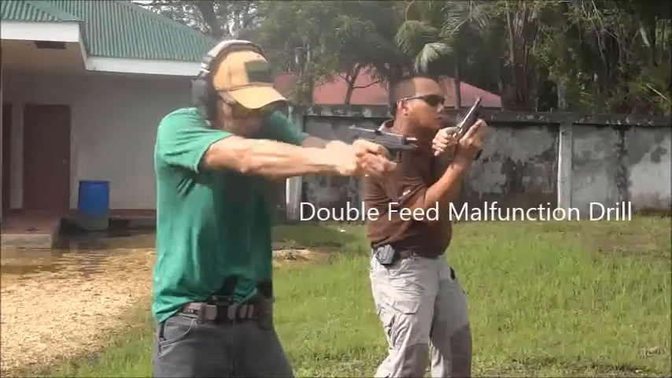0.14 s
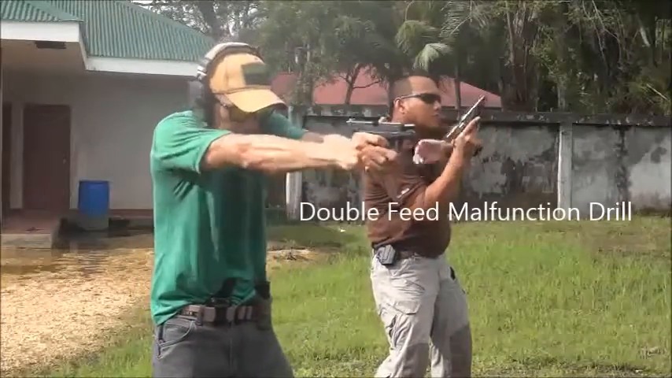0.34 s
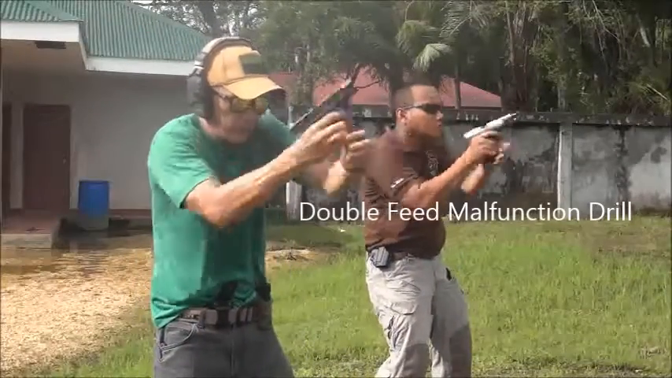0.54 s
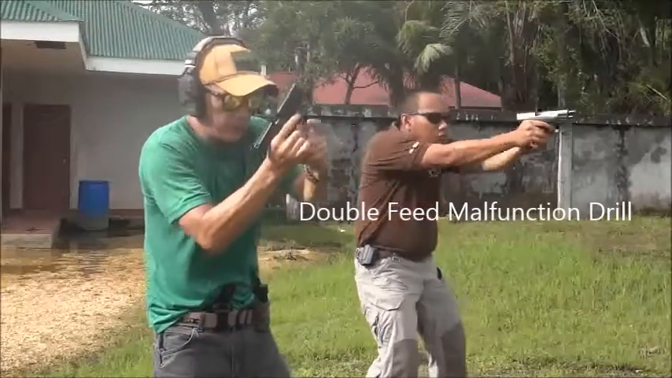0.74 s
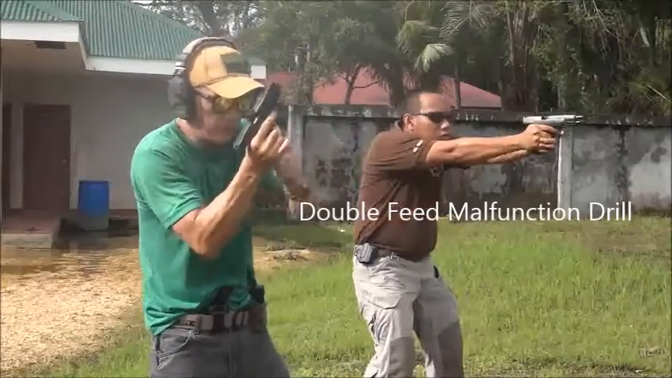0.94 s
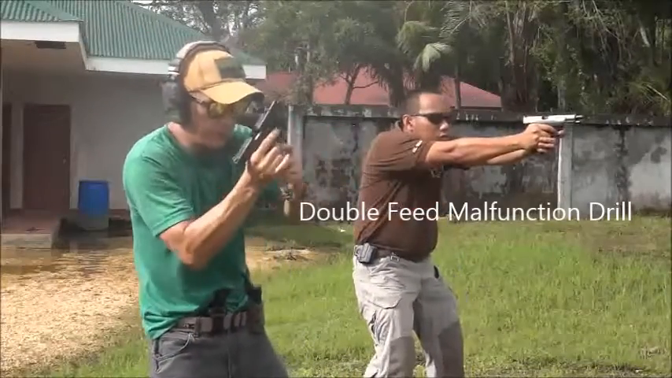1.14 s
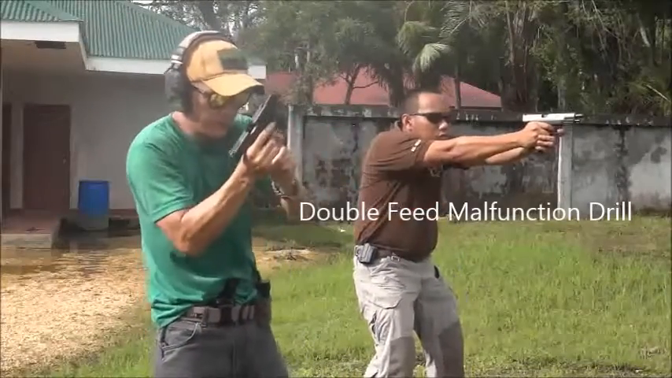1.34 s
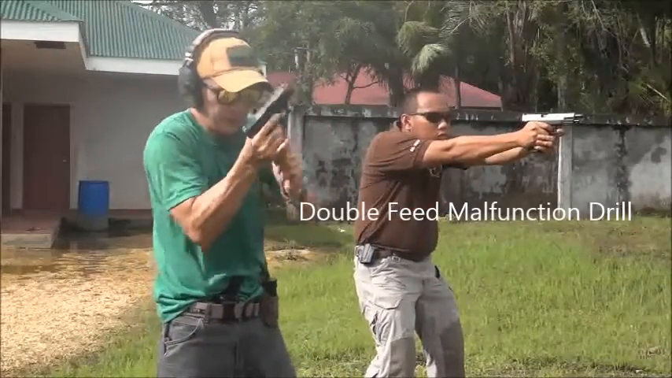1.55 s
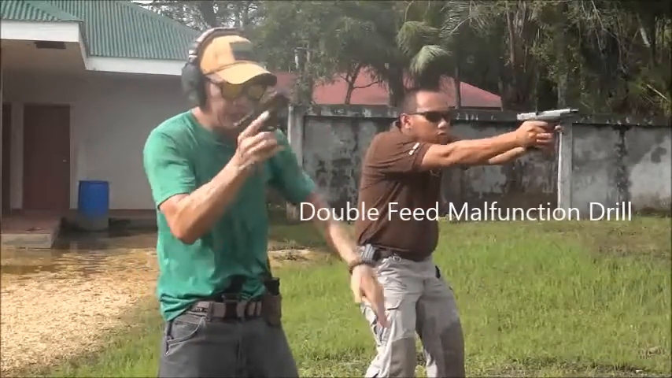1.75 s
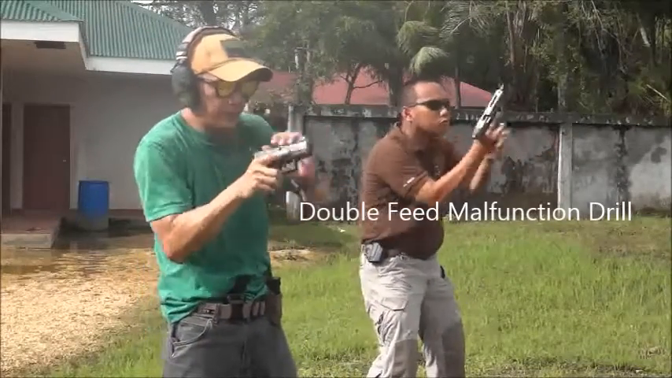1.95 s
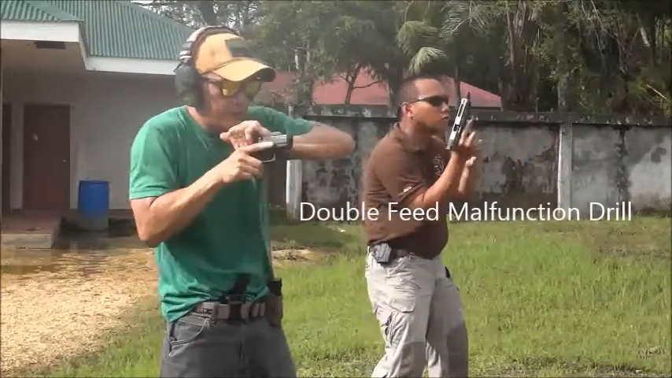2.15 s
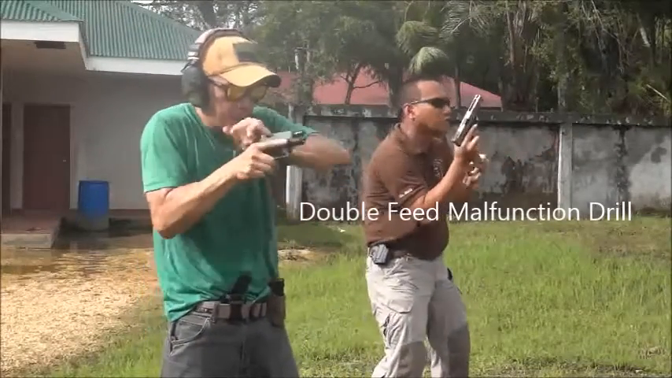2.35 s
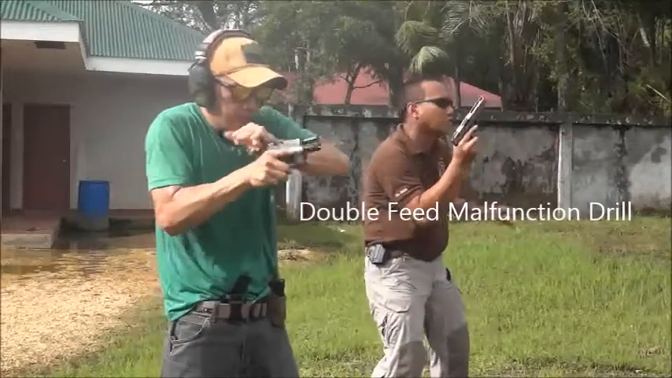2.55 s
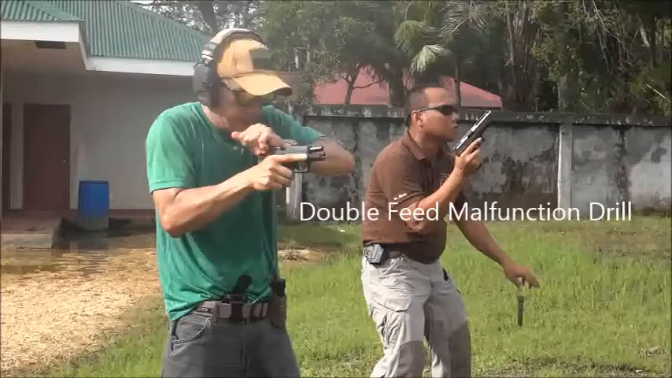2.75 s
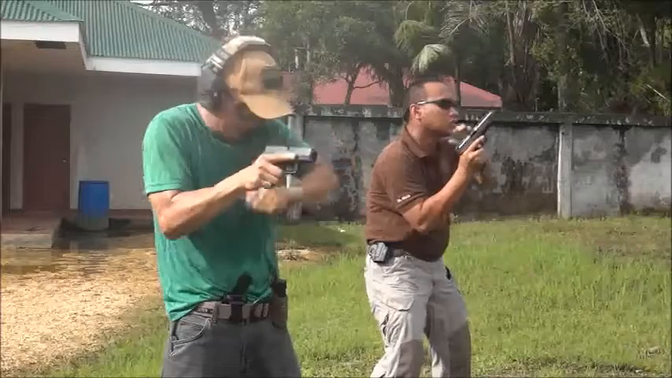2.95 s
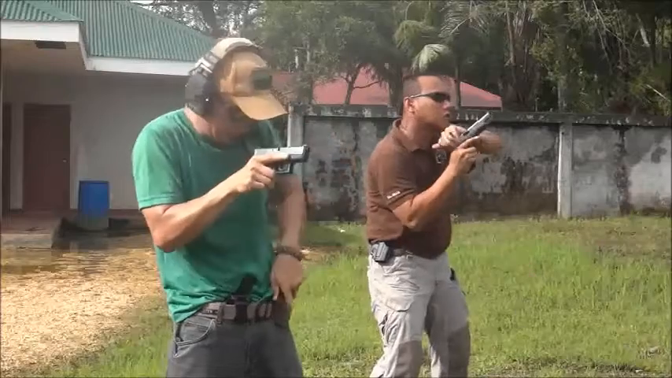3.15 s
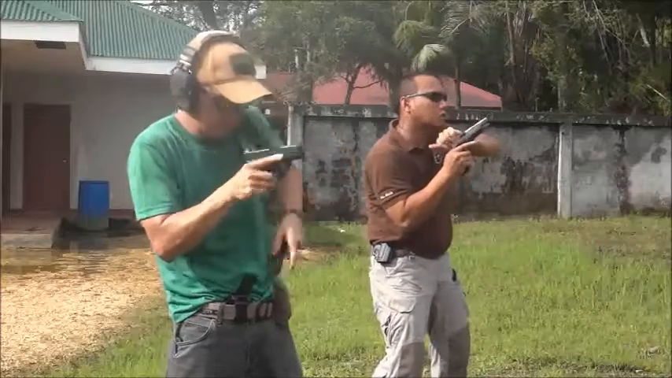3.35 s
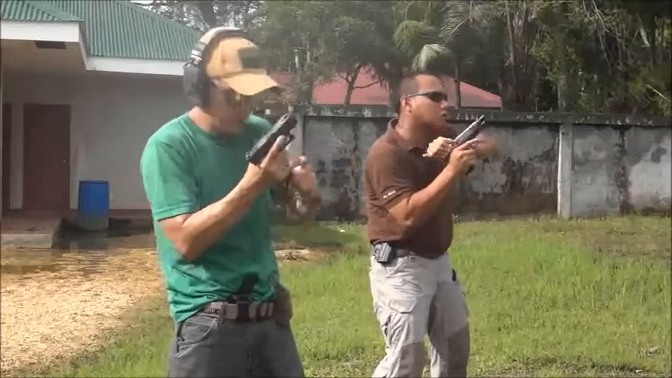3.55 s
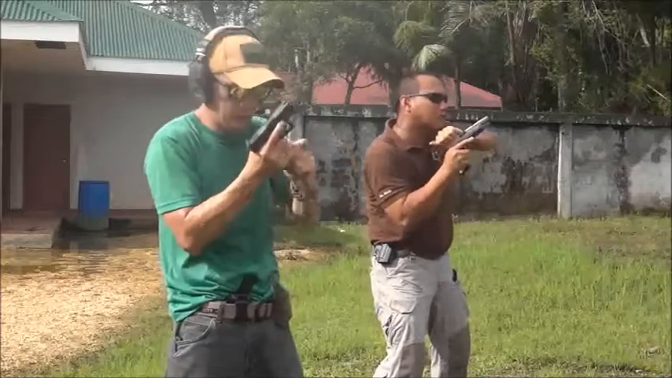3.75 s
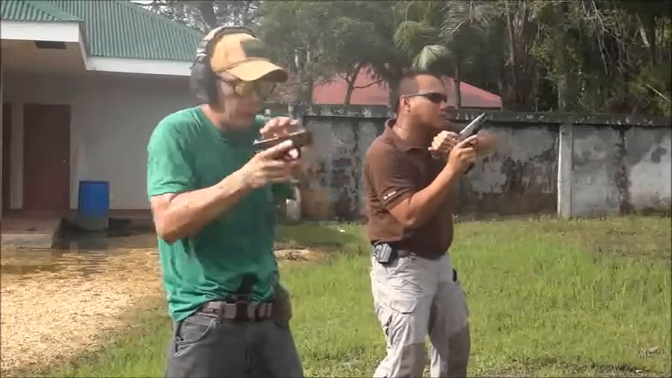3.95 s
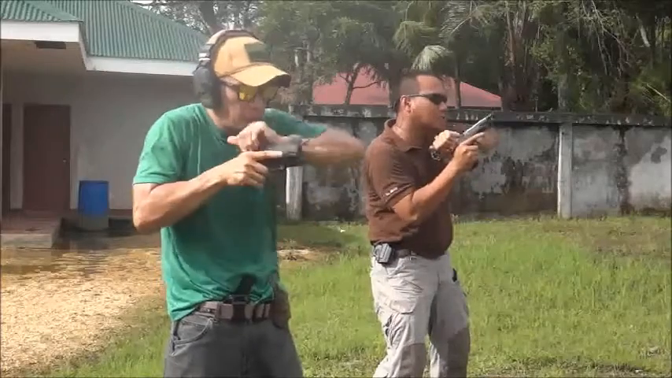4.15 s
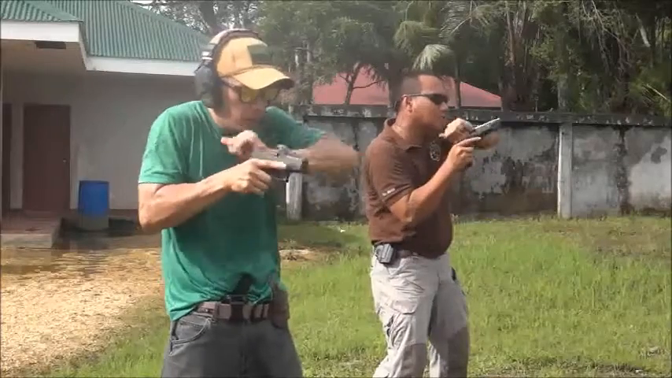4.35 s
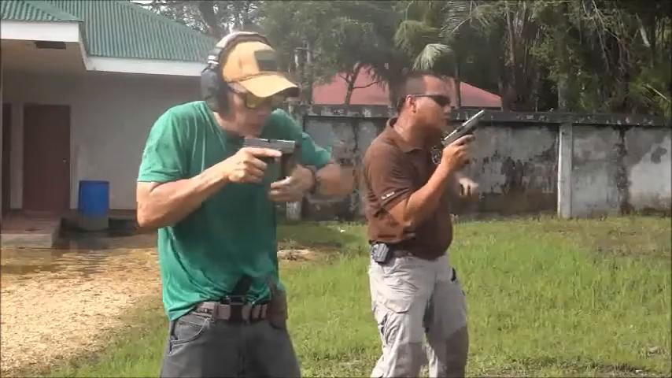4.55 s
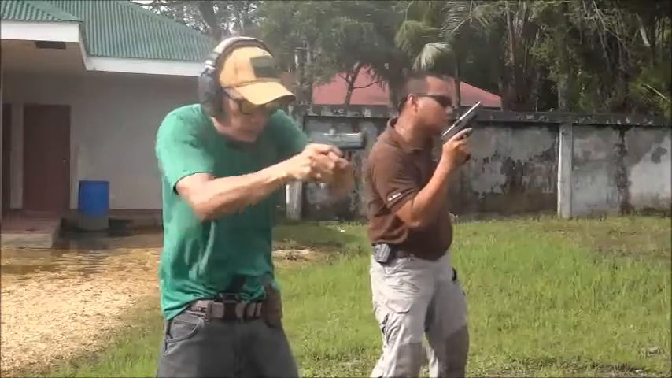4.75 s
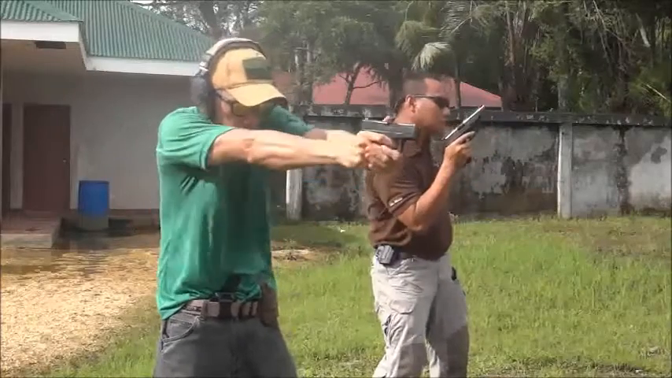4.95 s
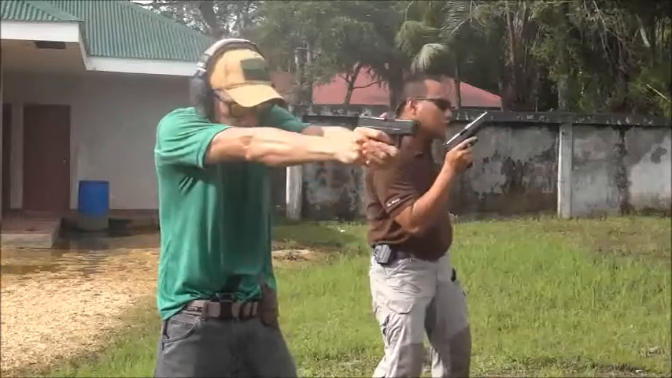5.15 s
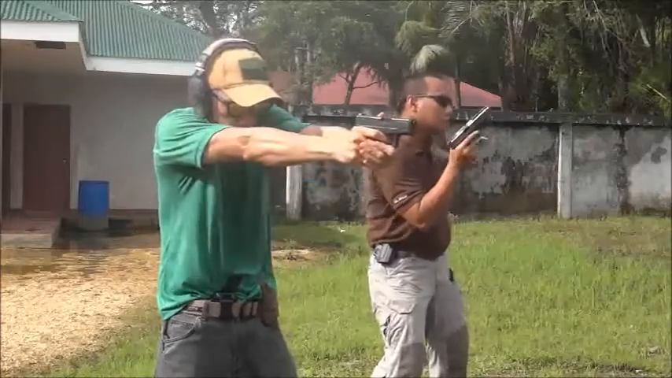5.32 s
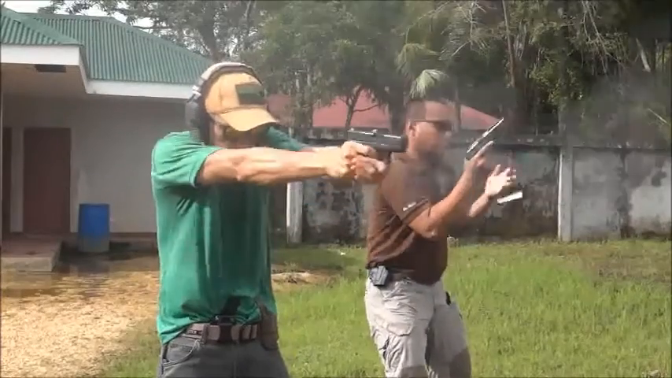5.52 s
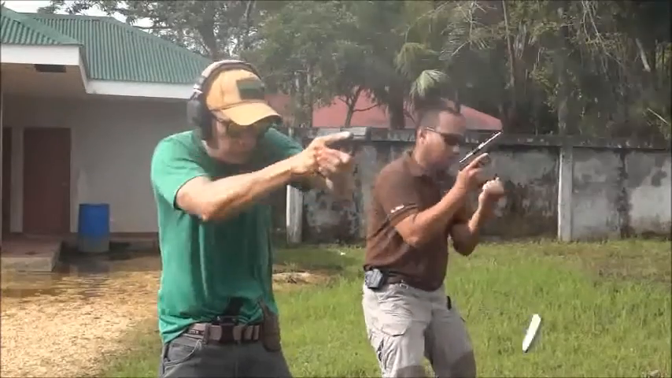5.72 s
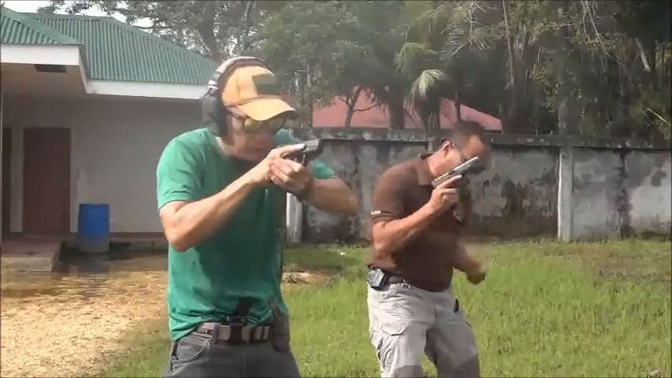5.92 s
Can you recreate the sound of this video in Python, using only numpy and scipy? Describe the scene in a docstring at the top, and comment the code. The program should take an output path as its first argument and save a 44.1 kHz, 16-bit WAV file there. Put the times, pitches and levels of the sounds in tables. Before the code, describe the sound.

Two pistols are racked and stripped close by in sharp metallic clacks outdoors, then one gunshot bangs and rolls back off walls and trees.

```python
"""A grass shooting range beside a house: two shooters rack their pistol slides and strip magazines close by.
Bursts of noise and ticks ring the steel modes of each pistol, and a house wall on the left slaps them back.
One shot rolls back from walls and trees as grainy noise in surging bands. A far rooster crows in wavering
sine overtones; a breeze thumps the microphone as low noise over a steady hush of air, leaves and traffic."""
import sys
import numpy as np
from scipy import signal
from scipy.fft import rfft, irfft
from scipy.io import wavfile
from scipy.ndimage import uniform_filter1d, minimum_filter1d

SR = 44100
rng = np.random.default_rng(int(sys.argv[2]) if len(sys.argv) > 2 else 0)


def master_out(mix):
    """Clip the mix to full scale and print it as 16-bit PCM to the path in sys.argv[1]."""
    frames = np.transpose(np.atleast_2d(mix))
    ceiling = np.clip(frames, -1, 1)
    pcm = np.round(ceiling * 32767).astype(np.int16)
    wavfile.write(sys.argv[1], SR, pcm)


N = 263718
T = np.arange(N) / SR


def undb(db):
    """Amplitude gain of a level in dB."""
    return 10 ** (np.asarray(db) / 20)


def unit(x):
    """Scales x to rms 1."""
    return x / np.sqrt(np.mean(x ** 2))


def curve(rows):
    """Joins the rows of a table by straight lines; gives each column after the time, one value a sample."""
    s, *columns = np.transpose(rows)
    return [np.interp(T, s, c) for c in columns]


def band(x, lo_hz, hi_hz, order=2):
    """Keeps the pitches between two edges."""
    return signal.sosfilt(signal.butter(order, [lo_hz, hi_hz], "band", fs=SR, output="sos"), x)


def split(x, gains, edges):
    """Bands of x, each of rms 1 times its gain; filtered twice so that neighbours join flat."""
    return sum(unit(band(band(x, lo, hi), lo, hi)) * g for g, (lo, hi) in zip(gains, edges))


def colour(x, points):
    """Shapes the spectrum of x by (Hz, dB) points, joined along log frequency."""
    hz, db = np.transpose(points)
    f = np.maximum(np.fft.rfftfreq(N, 1 / SR), 1)
    return irfft(rfft(x) * undb(np.interp(np.log(f), np.log(hz), db)), N)


def ring(x, modes, narrow):
    """Sum of resonances, each with gain 1 at its centre before its own dB; narrow scales their widths."""
    return sum(undb(db) * signal.lfilter(*signal.iirpeak(hz, hz / (width * narrow), SR), x)
               for hz, width, db in modes)


def walk(rate):
    """Random levels held 1 / rate s and slewed twice; spread near 1."""
    k = int(SR / rate)
    steps = np.repeat(rng.standard_normal(N // k + 1), k)
    return 1.38 * uniform_filter1d(uniform_filter1d(steps, k), k)[:N]


def wide(mid, other, side_db):
    """Left and right from a sound and an unrelated twin."""
    side = undb(side_db) * other
    return np.array([mid + side, mid - side])


# each steel hit, and some of the sharper echoes of hits off the house wall; body and top relative to its level:
# start_s, level_db, rise_ms, fade_t60_ms, body_rel_db, top_rel_db, loudest_clank_hz
HITS = [(0.0728, -27, 1.7, 29, -17, -3, 1640), (0.086, -11.5, 2.1, 19, -21, -1.5, 1650),
        (0.1163, -17.5, 0.89, 17, -17, -13, 3980), (.177, -33, 4, 36, -26, -8, 1150),
        (0.2603, -19.5, 1.1, 37, -17, 4, 3950), (0.2715, -12.5, 0.81, 25, -15, 0.5, 2220),
        (0.301, -19, 1.9, 15, -16, -10, 2310), (0.3598, -36, 1.6, 70, -13, -1, 2450),
        (0.451, -45, 2.6, 58, 6, -9, 2000), (0.558, -43, 4, 45, 1, 2, 4000),
        (.95, -30, .6, 75, -1.5, -11, 1730), (0.97, -20, .8, 12, -12, -11, 2270),
        (1.532, -17.5, 8.8, 15, -9, 2, 2600), (1.5465, -12.5, 2.9, 58, -8.5, 6, 4300),
        (1.576, -13, 1.1, 24, -8, -10, 4500), (1.588, -28.5, 3, 130, 0, 1, 2560),
        (1.643, -25.5, 1.3, 35, -4, 2, 4600), (1.6574, -34.5, 2.8, 99, -11, 3, 4400),
        (1.794, -35, .9, 27, 7, -25, 1750), (1.84, -36.5, 2.7, 24, 0, 8, 1700),
        (1.854, -44, 2, 29, 11, -14, 2100), (1.9265, -18, 5.6, 32, 0, -2, 1500),
        (1.94, -23, 1.6, 20, -17, -12, 3100), (2.19, -39, 2.8, 44, -12, -4.5, 3020),
        (2.2633, -16.5, 6.5, 29, -7.5, -1, 2320), (2.278, -17.5, 2.6, 79, -9.5, 6, 6560),
        (2.304, -14.5, 15.4, 22, -21, -9, 1610), (2.323, -8, 2.4, 13, -4.5, -3, 2100),
        (2.3303, -14.5, 0.49, 33, -4.5, 6, 3320), (2.344, -23, 1, 78, -8, 0, 4730),
        (2.368, -21.5, 14, 100, -10, -0.5, 6300), (2.41, -17, 3.6, 73, -9, 2.5, 4500),
        (2.4592, -22, 1.7, 43, 1, -11, 1430), (2.4983, -14, 0.63, 35, 0, -19, 1420),
        (2.523, -21.5, 2.3, 56, -7, 9.5, 2730), (2.5362, -14.5, 2.3, 70, -11, -5, 1460),
        (2.5648, -12, 1.4, 49, -7, 0.5, 4530), (2.597, -27, 2, 18, -12, -8, 2300),
        (2.63, -23, 1.4, 18, -14, -16, 3730), (2.6387, -32, 11, 32, -5, -18, 1580),
        (2.662, -9.5, 2.6, 42, -13.5, 1, 4000), (2.693, -22, 1.5, 14, -14, -6, 4600),
        (2.75, -32, 6.8, 39, -9, 4, 2970), (2.762, -18, 1.2, 9.2, -6, 7, 2420),
        (2.767, -11, 3.1, 46, -6, -8, 2310), (2.7919, -22, 4.6, 11, -13, -11, 3700),
        (2.799, -10.5, .8, 43, -6.5, -2.5, 4780), (2.859, -22.5, 1.3, 24, -15, 5.5, 6840),
        (2.8675, -15, 1.6, 38, -8.5, -9, 4600), (2.8854, -8.5, 1.9, 44, -17, 0, 3200),
        (2.917, -20, 1.8, 45, -6, -9, 4650), (2.953, -38, 1.4, 34, -23, 12, 6160),
        (2.983, -33, 1.8, 96, -5, 4, 4540), (3.0407, -15.5, 1.5, 28, 2, 1.5, 2890),
        (3.052, -23, 5.7, 98, -25, -5, 4000), (3.1247, -31.5, 0.88, 104, 5, -11, 2930),
        (3.17, -37.5, 13, 79, -7, -6, 4680), (3.358, -42, 3, 70, 5, 5, 4500),
        (3.5254, -14, 1.4, 35, -10, 4, 4450), (3.5337, -11, .85, 59, -12, -3, 7200),
        (3.5678, -17.5, 1.2, 22, -5.5, -2, 4360), (3.5768, -18, 1.9, 103, -8, 5, 3300),
        (3.598, -19.5, 12, 53, -10, 2, 4060), (3.659, -36, 2.5, 14, -10, 0, 4110),
        (3.668, -20.5, 2.2, 24, -8, -6, 3280), (3.6864, -31, 7.6, 41, -1, -4, 2440),
        (3.7005, -6, 2.1, 36, -9, 4, 7540), (3.73, -25, 2.3, 38, -8, 2, 3330),
        (3.7904, -25.5, 1.2, 33, -2, 5, 1870), (3.8186, -12.5, 1.35, 18, -8, 5, 4300),
        (3.826, -14.5, 1.4, 41, -12, 1, 4600), (3.8594, -17, 3.4, 9.8, -27, -2, 3450),
        (3.8662, -17.5, 2.5, 78, -7, 7, 3500), (3.894, -18, 3.4, 36, -18, -9, 2190),
        (3.9435, -48, 1.8, 38, -6, -17, 5230), (3.959, -41, 1.5, 84, -4, -15, 1920),
        (3.9856, -29, 4.6, 140, -5, -6, 3280), (4.0095, -11.5, 6.6, 39, -10, 2.5, 3400),
        (4.04, -17, 4.2, 24, -16, -7, 3360), (4.1022, -29, 2, 43, -16, 0.5, 2130),
        (4.1398, -41, 2.2, 39, -24, -9, 3320), (4.1611, -13.5, 0.88, 28, -19, 2, 2140),
        (4.166, -18, 3.7, 68, -6.5, 2.5, 2280), (4.1978, -12, 0.49, 94, -26, -1.5, 1255),
        (4.229, -14.5, 2, 83, -23, -8, 1240), (4.271, -14, 4, 26, -26, -2, 3380),
        (4.2812, -12, 5.6, 52, -6, -11, 2660), (4.312, -17, 2.3, 69, -21, 4, 1204),
        (4.345, -14.5, 1.8, 27, -23, -21, 4100), (4.353, -14.5, 2.4, 31, -17, -11, 3270),
        (4.364, -16, 1.3, 12, -4, 7, 4380), (4.3716, -9.5, 3, 38, -22, -3, 4340),
        (4.403, -25, 3, 36, -11, -2.5, 1990), (4.4914, -37.5, 5.9, 110, -11, -18, 2070),
        (4.5962, -41, 10, 200, -17, -10, 3000), (4.665, -38, 1.4, 68, -8, -1, 4370),
        (4.698, -43.5, 1.6, 29, 11, -12, 3290), (5.08, -47, 3, 30, 10, -4, 1300),
        (5.1278, -39.5, 2.6, 31, 18.5, -10, 1280), (5.161, -57, 2.6, 28, 5, -11, 1060)]
FADE_BEND = 0.89  # below 1 a rattle drops fast from its crest and then lingers


def hits(grit):
    """Each hit or sharp echo is a tick, then a short rattle with its own clank builds to a crest and dies away."""
    power, tick, clank = np.zeros((3, N)), np.zeros(N), np.zeros((2, N))
    ms = np.arange(int(.13 * SR)) / SR * 1000
    for s, db, rise_ms, t60_ms, body_db, top_db, hz in HITS:
        now = slice(int(s * SR), int(s * SR) + len(ms))
        rise = (ms / rise_ms) ** 0.61
        fall = 10 ** (-3 * (np.maximum(ms - rise_ms, 0) / t60_ms) ** FADE_BEND)
        rattle = np.minimum(rise, fall)
        power[:, now] += np.outer(undb([db + body_db, db, db + top_db]), rattle) ** 2
        tick[now.start] += undb(db - 4) * np.exp(-rise_ms / 5)  # slow builds start with a weaker tick
        for g, c in zip(grit, clank):
            c[now] += undb(db + 11) * ring(g[now] * rattle, [(hz, hz / 18, 0)], 1)
    return np.sqrt(power), tick, clank


# each spell of handling, slide and springs rubbing: start_s, hands_still_s, level_db, fade_db_per_s
RUB = [(0.06, .16, -34.5, 13), (1.6, 1.9, -35.5, 90), (2.27, 3.012, -28, 37), (3.628, 4.456, -25.5, 45)]
RUB_RISE_S, RUB_TOP_DB, RUB_TOP_SAG = 0.032, -8, 0.51  # the top fades faster by this share
JOLTS_PER_S, JOLT_DB, JOLT_S = 17, 0.5, 0.0055  # loose parts knock now and then


def rubbing():
    """Levels of body, middle and top as slides stick and slip, loose parts jolt and the hands fall still."""
    knocks = 1. * (rng.random(N) < JOLTS_PER_S / SR)
    jolts = signal.lfilter([1], [1, -np.exp(-1 / (JOLT_S * SR))], knocks)
    uneven = undb(3.2 * walk(90)) * (1 + undb(JOLT_DB) * jolts)
    power = np.zeros((3, N))
    for start, still, db, fade in RUB:
        lost_db = fade * np.maximum(T - still, 0)
        swell = np.clip((T - start) / RUB_RISE_S, 0, 1) * uneven * undb(db - lost_db)
        tone_db = [[-14], [-5], [RUB_TOP_DB]] - np.outer([0, 0, RUB_TOP_SAG], lost_db)
        power += (swell * undb(tone_db)) ** 2
    return np.sqrt(power)


def clang(drive, modes):
    """Blows land on ever other spots, so each mode is struck hard at one moment and barely at the next."""
    return sum(ring(drive * undb(3.5 * walk(45) - 3.5), [mode], 0.69) for mode in modes)


# a house wall on the left returns each hit: delay_s, level_db
WALL = [(0.0306, -30), (0.0304, -14)]
WALL_PAN_DB, WALL_TOP_HZ = 12, 6100


def house_wall(steel):
    """The wall sends the steel back late, dulled and louder on the left."""
    dull = band(steel, 530, WALL_TOP_HZ, order=1)
    echo = sum(undb(db) * np.roll(dull, int(s * SR)) for s, db in WALL)
    return echo * undb([[WALL_PAN_DB / 3], [-WALL_PAN_DB * 2 / 3]])


# which pistol is being worked: time_s, share of the second (0-1)
SECOND = [(0, 1), (.6, 0), (1.4, 0.01), (3.3, 0), (3.45, 0.97), (4.22, 0.99), (4.3, 0.34), (5.5, 0.8)]
# steel modes of each pistol, widths before clang narrows them: pitch_hz, width_hz, level_db
FIRST_PISTOL = [(1404, 110, -3), (2012, 170, -8), (3158, 54, -9), (4640, 110, -7), (6830, 160, -13),
                (7300, 210, -13.5), (9460, 240, -4), (10810, 103, -14.5)]
SECOND_PISTOL = [(840, 200, -6), (1230, 200, -13), (1706, 160, -6), (2030, 180, -12), (3330, 45, -5),
                 (4170, 120, -5), (4630, 57, -12), (6620, 70, -10), (9500, 50, -9), (10700, 240, 2)]
# body, middle and top of a steel click: low_hz, high_hz
CLICK_BANDS = [(860, 2170), (1800, 6400), (7000, 13130)]


def pistols():
    """Hits and rubbing, both made of dense grit, shake the steel modes of whichever pistol is worked."""
    grit = [unit(rng.standard_normal(N) * undb(np.minimum(2.45 * rng.exponential(size=N), 11)))
            for _ in range(2)]
    hit_levels, tick, clank = hits(grit)
    rub_levels = rubbing()
    share = curve(SECOND)[0]
    twins = []
    for g, c in zip(grit, clank):
        blows = split(g, hit_levels, CLICK_BANDS)
        grind = split(g, rub_levels, CLICK_BANDS)
        drive = blows + undb(-2.5) * grind + undb(-10) * tick
        steel = clang(drive * np.sqrt(1 - share), FIRST_PISTOL)
        steel = steel + clang(drive * np.sqrt(share), SECOND_PISTOL)
        bare = undb(-5.0) * blows + undb(-8.5) * grind + band(tick, 800, 12000)
        twins.append(bare + undb(6) * steel + c)
    return wide(*twins, -14.5) + house_wall(twins[0])


SHOT_S = 5.439
# the shot as it rolls back, before an overall trim: time_s, level_db, low_rel_db, treble_rel_db
ROAR = [(5.44, -7, -11, 3), (5.47, -9.5, -3, -12), (5.53, -12, -6, -10), (5.57, -17.5, 0, -8),
        (5.615, -18, 1, -6), (5.628, -14.5, -9, -19), (5.73, -12, -7, -12), (5.89, -18, -7, -13),
        (5.98, -23, -11, -15)]
# louder single echoes, relative to each other: start_s, peak_rel_db
SLAPS = [(5.471, 0), (5.524, 3), (5.54, 0), (5.564, 3), (5.598, 1), (5.688, -3), (5.737, 0), (5.904, 0)]
# spectrum of the roar before its bands are levelled: pitch_hz, gain_db
ROAR_COLOUR = [(53, -48), (90, -24), (189, -4), (686, -2.5), (1030, 2.5), (1700, -5.5), (2110, -2.5),
               (3640, -5.5), (4110, -10), (4820, -6.5), (5330, -8.5), (8640, -11.5), (11000, -16.5),
               (14300, -61), (22000, -120)]
MID_FOLLOW = .4  # the 2-5 kHz band moves by this share of the treble's dB
# a far wall returns one long narrow roar; its width is before narrowing
FAR_S, FAR_DB, FAR_FADE_DB_PER_S, FAR_HZ, FAR_WIDTH_HZ = 5.622, -19, 50, 1000, 320


def shot():
    """A bright crack, then echoes from walls and trees arriving as a dense, grainy, duller roar."""
    db, low_db, top_db = curve(ROAR)
    mid_db = MID_FOLLOW * np.minimum(top_db, -4)
    db = np.where(T >= SHOT_S, db, -120) - 1.5 + 0.82 * walk(250)  # arrivals come in clumps
    t = np.arange(int(0.025 * SR)) / SR
    slaps = np.zeros(N)
    for s, peak_db in SLAPS:
        i = int(s * SR)
        slaps[i:i + len(t)] += (undb(peak_db - 13.5) * np.exp(-t / 0.01))[:N - i]
    narrow = [(FAR_HZ, FAR_WIDTH_HZ, 0)]
    far_db = FAR_DB - FAR_FADE_DB_PER_S * np.maximum(T - FAR_S, 0) + 2.5 * walk(50)
    far_gain = (T >= FAR_S) * undb(far_db)
    edges = [(130, 600), (600, 2000), (2000, 5000), (5000, 12000)]
    # each wall or tree line returns its own colour, so the bands surge apart, the low ones most
    lumps = [undb(low_db + 3.5 * walk(45)), undb(2.5 * walk(60)), undb(mid_db + 1.5 * walk(60)), undb(top_db)]
    twins = []
    for _ in range(2):
        grains = rng.standard_normal(N) * undb(3.3 * rng.exponential(size=N))
        arrivals = colour(grains, ROAR_COLOUR)
        far = unit(ring(ring(arrivals, narrow, 0.93), narrow, 0.93)) * far_gain
        twins.append(split(arrivals, lumps, edges) * np.hypot(undb(db), slaps) + far)
    return wide(*twins, -12)


# rooster notes, scoop as a share of the pitch:
# start_s, end_s, second_harmonic_hz, scoop, level_db, fade_db_per_s
CROW = [(4.718, 5.123, 2040, .04, -45.5, 19), (5.01, 5.448, 1898, .008, -44.5, 16)]
# overtone stack: multiple of the second harmonic, level_db
CROW_ORDERS = [(.5, -15.5), (1, 0.5), (1.5, -14), (2, -12.5)]
CROW_SCOOP_S = .04


def rooster():
    """A hoarse overtone stack from far off; each note scoops up to pitch and fades; two paths blur each line."""
    out = 0
    for start, end, hz, scoop, db, fade in CROW:
        since = np.maximum(T - start, 0)
        gate = np.interp(T, [start, start + 0.024, end - .02, end], [0, 1, 1, 0])
        level = gate * undb(db - fade * since)
        pitch = hz * (1 - scoop * np.exp(-since / CROW_SCOOP_S))
        for _ in range(2):
            phase = 2 * np.pi * np.cumsum(pitch * (1 + .025 * walk(400))) / SR  # the jitter makes it hoarse
            stack = sum(undb(g) * np.sin(k * phase) for k, g in CROW_ORDERS)
            out = out + level * undb(3.5 * walk(43)) * stack
    return out


# breeze on the microphone: time_s, level_db
WIND = [(0, -49), (.6, -46.5), (1.5, -48), (2.2, -45.5), (3.0, -51.5), (3.8, -44), (4.3, -49.5), (4.7, -38),
        (5.05, -42.5), (5.3, -33.5), (5.6, -41), (5.98, -38.5)]
# single gust thumps, levels before their fade: start_s, level_db, pitch_hz
THUMPS = [(4.713, -25, 71), (4.733, -30, 70), (4.97, -31, 70), (5.207, -30, 80.5), (5.308, -30, 110),
          (5.327, -36, 90), (5.365, -29, 70)]


def wind():
    """Low turbulence over the microphone, with a few single pressure thumps."""
    twins = [unit(band(rng.standard_normal(N), 47.5, 143.6)) * undb(curve(WIND)[0] + 1.22 * walk(6))
             for _ in range(2)]
    for s, db, hz in THUMPS:
        t = np.maximum(T - s, 0)
        twins[0] = twins[0] + undb(db) * np.sin(2 * np.pi * hz * t) * np.exp(-(t * hz / 1.3) ** 2)
    return wide(*twins, -9)


# spectrum of the hush: pitch_hz, gain_db
AIR = [(15, -44), (25, -23), (75, -31), (180, -6), (233, -12), (272, -5), (399, -9.5), (862, -14.5),
       (1030, -13.5), (2010, -16), (2230, -15), (3440, -18), (8900, -25), (10600, -30), (11500, -42),
       (15000, -81), (22000, -120)]
# width of the hush: pitch_hz, side_minus_mid_db
AIR_SIDE = [(60, -13), (110, -21), (190, -6.5), (340, -6.5), (610, -2.5), (1100, -3), (1960, -5),
            (3500, -6), (6250, -4.5), (11200, -4.5)]
# air, leaves and far traffic: time_s, level_db (set near 290-560 Hz), leaf_hiss_rel_db
HUSH = [(0, -53, 2.5), (1.2, -50.5, 1), (2.1, -50, .5), (4.3, -51, 1), (4.8, -50.5, -0.5),
        (5.4, -49.5, -0.5)]


def air():
    """Steady outdoor hush of coloured noise, wider in the middle pitches, flickering slightly."""
    mid, side = (colour(rng.standard_normal(N), AIR) for _ in range(2))
    side = colour(side, AIR_SIDE)
    db, hiss_db = curve(HUSH)
    level = undb(db + 0.39 * walk(6.1)) / np.std(band(mid, 291, 560))
    both = np.array([mid + side, mid - side]) * level
    both = signal.sosfilt(signal.butter(2, 130, "high", fs=SR, output="sos"), both)
    return both + (undb(hiss_db) - 1) * band(both, 1600, 15000, order=1)


DUCK_FROM_DB, DUCK_SHARE, DUCK_RELEASE_S = -24, 0.26, 0.01


def duck(loud):
    """Gain that sinks under a loud sound and comes back shortly after."""
    keep = np.exp(-1 / (DUCK_RELEASE_S * SR))
    power = signal.lfilter([1 - keep], [1, -keep], np.mean(loud ** 2, axis=0))
    return (1 + power / undb(DUCK_FROM_DB) ** 2) ** (-DUCK_SHARE / 2)


def scene():
    """Pistols, shot and rooster over a background that sinks under the clacks."""
    steel = pistols()
    return steel + shot() + rooster() + (wind() + air()) * duck(steel)


LIMIT_DB, LIMIT_RATIO, LIMIT_RELEASE_S = -7, 1.78, 0.0048
TOP_HZ, LEFT_DB = 11000, .45  # treble cutoff; left over right


def record(dry):
    """A fast limiter flattens crests and dims what follows them; soft clipping rounds peaks; the top is cut."""
    peak = -minimum_filter1d(-np.abs(dry).max(axis=0), size=88, origin=40)  # held about 2 ms
    keep = np.exp(-1 / (LIMIT_RELEASE_S * SR))
    released = signal.lfilter([1 - keep], [1, -keep], peak)
    loud = np.maximum(uniform_filter1d(peak, size=22), released)
    gain = (undb(LIMIT_DB) / np.maximum(loud, undb(LIMIT_DB))) ** (1 - 1 / LIMIT_RATIO)
    rounded = np.tanh(1.106 * dry * gain) / 1.139
    balanced = rounded * undb([[LEFT_DB / 2], [-LEFT_DB / 2]])
    return signal.sosfilt(signal.ellip(10, .2, 75, TOP_HZ, fs=SR, output="sos"), balanced)


dry = scene()
out = record(dry)
master_out(out)
```